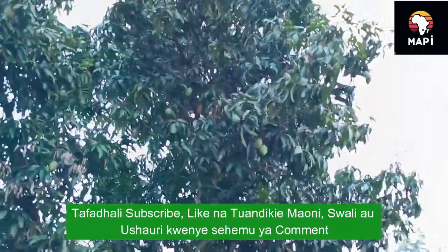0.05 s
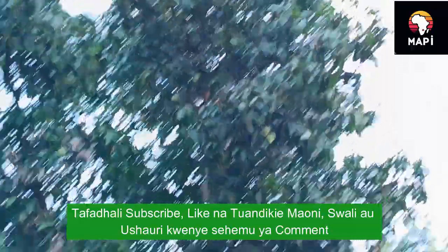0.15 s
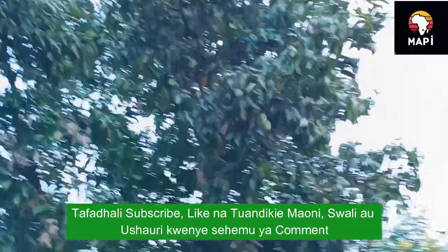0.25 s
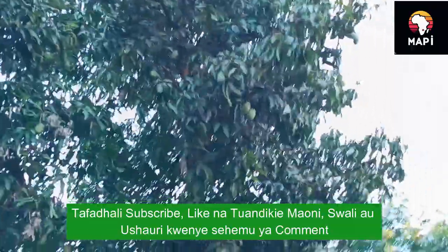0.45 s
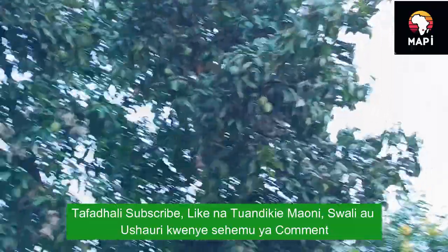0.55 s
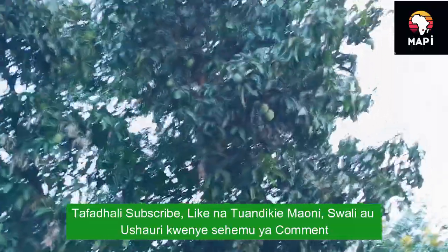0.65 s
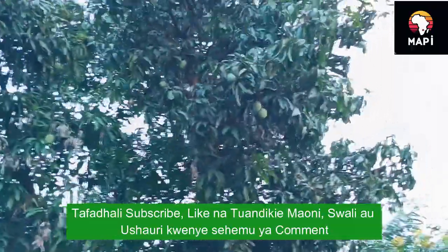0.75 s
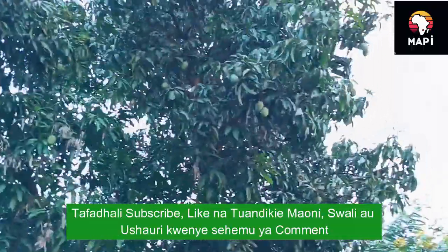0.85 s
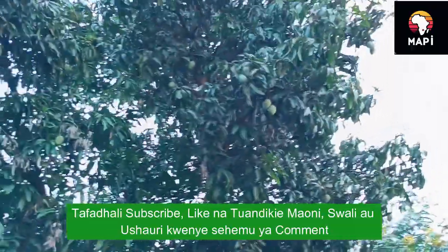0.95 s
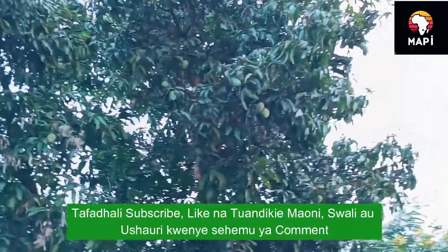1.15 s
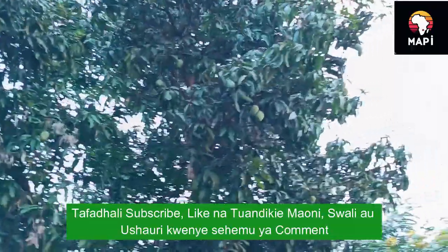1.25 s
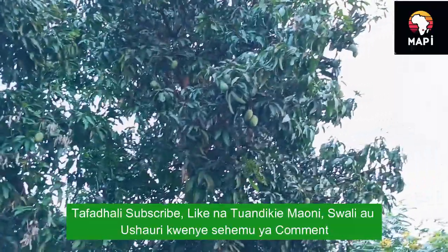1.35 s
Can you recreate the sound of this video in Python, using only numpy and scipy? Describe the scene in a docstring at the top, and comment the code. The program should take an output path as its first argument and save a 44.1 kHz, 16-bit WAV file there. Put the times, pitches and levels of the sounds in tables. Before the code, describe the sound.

Leaves rustle crisply as a tree branch is shaken outdoors. The rustle swells from about 0.1 seconds and is loudest around 0.4, where a light wooden knock and a sharp twig click sound within it. It surges again near 0.7 and 0.9 seconds, then fades. A few single leaf slaps stand out between 1.1 and 1.2 seconds, and by 1.4 only faint outdoor air is left.

```python
"""A leafy branch is shaken outdoors: its rustle swells quickly, surges three times and dies away.
Stiff leaves collide and slide, radiating ticks, friction noise and short damped tones; whole blades flap.
Twigs click, and the branch knocks once in its wooden modes. As the foliage settles, single leaf slaps
stand out. The surrounding trees scatter the sound, over faint outdoor air and a brief low tone."""
import sys
import numpy as np
from scipy import signal
from scipy.fft import rfft, irfft, next_fast_len
from scipy.io import wavfile
from scipy.ndimage import uniform_filter1d, map_coordinates

SR = 44100
rng = np.random.default_rng(int(sys.argv[2]) if len(sys.argv) > 2 else 0)


def store_wav(level_fs):
    """Save 16-bit WAV to argv[1]."""
    pcm = np.round(np.clip(np.atleast_2d(level_fs), -1, 1) * 32767)
    wavfile.write(sys.argv[1], SR, pcm.T.astype(np.int16))


N = 61739

# spectrum of the finest crackle: f/Hz, relative level/dB
FIZZ_SPECTRUM = [(5000, -43), (8500, -0.5), (10000, 3), (12500, -3.5), (14000, -7.5), (15000, -10.5),
                 (15700, -16)]


def foliage():
    """Incoherent superposition: leaf edges tick and fizz, leaf faces rub and whole blades flap."""
    # rustle envelope: t/s, treble tick level/dB, mid-range rub level/dB, low flap level/dB
    envelope = [(0, -67, -75, -59.5), (.09, -59.5, -69, -99), (0.143, -45, -58, -65),
                (0.151, -36, -53.5, -63), (0.184, -39, -46.5, -68.5), (0.213, -31, -37.5, -56),
                (.32, -30.5, -40, -53), (0.371, -22.5, -34.5, -42.5), (0.384, -24, -31.5, -48),
                (0.422, -22.5, -30.5, -41), (.47, -24, -30, -41.5), (.55, -27, -34, -40),
                (0.599, -31.5, -40, -48), (.63, -33, -37, -53.5), (.67, -27.5, -32.5, -44.5),
                (0.701, -31, -37, -45.5), (0.724, -21.5, -31, -43), (0.754, -26.5, -31, -38),
                (0.813, -34, -39, -51.5), (0.869, -28.5, -33, -45), (0.922, -25, -31, -52),
                (.95, -33.5, -38.5, -50), (0.989, -35.5, -38.5, -48.5), (1.067, -46.5, -51.5, -63),
                (1.096, -36.5, -43.5, -63), (1.14, -49, -57, -67), (1.167, -45.5, -47.5, -58),
                (1.245, -66, -65.5, -74), (1.28, -68, -70, -78), (1.33, -65, -69.5, -76),
                (1.4, -64.5, -70.5, -84)]
    # spectra of ticking, rubbing and flapping: f/Hz, relative level/dB
    tick_spectrum = [(2500, -42), (4500, -29), (5600, -11.5), (6500, -6), (7350, 0.5), (8200, -4.5),
                     (9200, -11.5), (11000, -21.5), (13000, -27.5), (15500, -36.5)]
    rub_spectrum = [(900, -30.5), (1700, -9), (2200, -8.5), (2650, -5), (3400, -6.5), (4500, 1),
                    (5400, 3.5), (6500, -6), (9000, -25)]
    flap_spectrum = [(50, -29), (150, -17.5), (250, -9), (400, -17), (650, 0.5), (900, 1.5), (1200, 4),
                     (1600, -6), (2500, -8.5), (5000, -61.5)]
    times, *levels = np.transpose(envelope)
    tick_db, rub_db, flap_db = [np.interp(np.arange(N) / SR, times, db) for db in levels]
    fizz_db = tick_db.max() - 13.5 + 1.24 * (tick_db - tick_db.max())  # grows faster than the ticking
    fizz = crackle(fizz_db, per_s=1600, spread_db=11, slide=1, clump_db=4, clump_rate=200)
    tick = crackle(tick_db - .5, per_s=4500, spread_db=1, slide=1, clump_db=2, clump_rate=350)
    rub = crackle(rub_db - 2, per_s=3000, spread_db=4.5, slide=.9, clump_db=1.97, clump_rate=200)
    flap = crackle(flap_db - 3.5, per_s=900, spread_db=4, slide=1, clump_db=2, clump_rate=120)
    edges = leaf_rings(tick_db - 9, low_hz=6200, high_hz=8796, per_s=431, t60_cycles=85)
    faces = leaf_rings(rub_db - 7.5, low_hz=2390, high_hz=6207, per_s=425, t60_cycles=54)
    blades = leaf_rings(flap_db - 7, low_hz=252, high_hz=1706, per_s=378, t60_cycles=24)
    treble = colour(fizz, FIZZ_SPECTRUM) + colour(tick, tick_spectrum)
    body = colour(rub, rub_spectrum) + colour(flap, flap_spectrum)
    return treble + body + edges + faces + blades


def crackle(level_db, per_s, spread_db, slide, clump_db, clump_rate):
    """Shot noise of tiny contacts over sliding noise; harder shaking raises their rate, up to per_s."""
    chance = np.clip(per_s / SR * amp(.5 * (level_db - level_db.max())), 0, 1)
    sizes = amp(spread_db * np.clip(rng.standard_normal(N), -2, 2)) * np.sign(rng.standard_normal(N))
    ticks = unit((rng.random(N) < chance) * sizes / np.sqrt(chance))
    texture = (ticks + slide * rng.standard_normal(N)) * amp(clump_db * wobble(clump_rate))
    running_power = np.abs(uniform_filter1d(texture ** 2, SR // 30))
    return amp(level_db) * texture / np.sqrt(running_power + 1e-9)


def leaf_rings(level_db, low_hz, high_hz, per_s, t60_cycles):
    """Damped free vibration: each struck leaf rings at a pitch set by its size, middling ones loudest."""
    out, t = np.zeros(N + SR // 10), np.arange(SR // 10) / SR
    rise_cycles, spread_db = .27, 4
    for i, (when, smallness, force) in enumerate(rng.random((int(per_s * N / SR), 3))):
        hz = low_hz * (high_hz / low_hz) ** smallness
        shape = (1 - np.exp(-t * hz / rise_cycles)) ** 2 * amp(-60 * t * hz / t60_cycles)
        strike = (-1) ** i * amp(-spread_db * np.log(1 - .9 * force))
        size_weight = np.sqrt(hz * np.sin(np.pi * smallness))
        out[int(when * N):][:len(t)] += strike * size_weight * shape * np.sin(2 * np.pi * hz * t)
    return amp(level_db) * unit(out[:N])


def leaf_scrapes():
    """Forced resonance: rough friction drives a leaf at its own pitch as it slides over another."""
    # slides: middle t/s, duration/s, resonance f/Hz, bandwidth/Hz, level/dB
    slides = [(0.047, .06, 7460, 450, -63.5), (0.127, 0.063, 7660, 500, -49),
              (0.162, 0.048, 7800, 885, -36.5), (.16, 0.036, 2820, 400, -54),
              (0.252, 0.052, 2370, 600, -45.5), (0.454, .02, 1265, 354, -36.5),
              (0.682, 0.069, 2420, 294, -44), (0.775, 0.054, 1070, 250, -48),
              (0.878, 0.075, 850, 328, -45.5), (0.9, 0.063, 4560, 600, -31.5),
              (0.98, 0.023, 4460, 400, -40), (0.982, 0.025, 850, 350, -50), (1.151, 0.0062, 2920, 350, -43),
              (1.161, 0.021, 4900, 705, -39), (1.221, 0.036, 4750, 600, -50.5),
              (1.313, 0.024, 4830, 700, -58), (1.319, 0.043, 2420, 640, -59),
              (1.394, 0.0061, 2900, 500, -60.5)]
    out, t = np.zeros(N), np.arange(N) / SR
    for middle, duration, hz, width, db in slides:
        friction = rng.standard_normal(N) * amp(2 * wobble(300))
        band = signal.butter(2, [hz - width / 2, hz + width / 2], "bandpass", fs=SR, output="sos")
        swell = np.exp(-(2 * (t - middle) / duration) ** 2)
        out += amp(db) * swell * unit(signal.sosfilt(band, friction))
    return out


def snaps():
    """Impact transients: a twig or leaf contact gives a short crack, then the leaf shivers briefly."""
    # contacts: t/s, bright level/dB, low and fizz level/dB (both relative to bright), t60/s
    contacts = [(0.021, -50.5, -8, -9.5, 0.026), (.1462, -32.5, -22, -8.5, 0.025),
                (.191, -24.5, -27, -16, .009), (0.214, -25, -26, -24, 0.02),
                (0.3657, -19.5, -7, -8.5, 0.037), (0.3961, -8.5, -4.5, -11, 0.013),
                (0.4, -6, -27, -13, 0.013), (0.423, -16, -14, -9, 0.0093), (0.4552, -19, -5, -14, 0.0096),
                (0.55, -21.5, 2, -28, 0.0077), (0.5609, -19.5, 2, -6.5, 0.014),
                (0.7193, -19, -10, -18, .014), (0.745, -17, -6, -20, 0.011), (.784, -19, -4, -26, .015),
                (0.852, -24.5, -13, -3, 0.062), (0.887, -26, -6, -23, 0.009), (0.908, -26, -1, -35, .009),
                (0.919, -21, -1, -21, 0.012), (0.958, -26.5, -1, -14, 0.023), (0.9877, -33, 5, -24, .01),
                (1.0748, -19.5, -5.5, -31, 0.0083), (1.0838, -30, -10, -25, .012),
                (1.13, -29.5, -6.5, -23, 0.01), (1.1577, -22.5, -7.5, -28.5, 0.0084),
                (1.17, -30, -6, -32, .006), (1.1998, -28.5, -4, -20, 0.0088),
                (1.2018, -29, -1.5, -20, 0.011), (1.26, -54, -11.5, -28.5, 0.017),
                (1.3028, -48, 4, -35, 0.008), (1.3166, -48, 1, -36, 0.012)]
    # spectra of a crack's bright and low parts: f/Hz, relative level/dB
    bright_spectrum = [(2000, -39.5), (4200, -17), (5800, -6), (7100, 4.5), (8500, -3.5), (10500, -19.5),
                       (13000, -32.5), (15500, -45)]
    low_spectrum = [(150, -27), (600, -14.5), (1400, -8), (2000, -4.5), (2900, -4.5), (4600, 4), (6500, 7),
                    (9000, -14.5), (15000, -45)]
    attack_s, shiver_db, shiver_t60_s = .00037, -15.5, .083
    bright, low, fizz = np.zeros((3, N))
    for start, db, low_db, fizz_db, t60 in contacts:
        t = np.maximum(np.arange(N) / SR - start, 0)
        decay = amp(-60 * t / t60) + amp(shiver_db - 60 * t / shiver_t60_s)
        shape = (1 - np.exp(-t / attack_s)) * decay
        bright += amp(db) * shape * rng.standard_normal(N)
        low += amp(db + low_db) * shape * rng.standard_normal(N)
        fizz += amp(db + fizz_db) * shape * rng.standard_normal(N)
    return colour(bright, bright_spectrum) + colour(low, low_spectrum) + colour(fizz, FIZZ_SPECTRUM)


def branch_knock():
    """Modal vibration: the wood gives one dull knock just before the loudest crack."""
    # modes of the branch: f/Hz, relative level/dB, t60/s
    wood_modes = [(360, -17, 0.036), (500, -4, 0.042), (670, -6, 0.039), (830, 2, 0.036), (960, 5, 0.03),
                  (1450, -4.5, 0.028)]
    return amp(-27.5) * modes(wood_modes, start_s=.3903)


def tree_scatter(x, level_db=-13.5, t60_s=.14):
    """Diffuse scattering: the surrounding trees return a short, exponentially decaying echo."""
    t = np.arange(SR // 3) / SR
    tail = rng.standard_normal(len(t)) * amp(-60 * t / t60_s)
    return amp(level_db) * signal.fftconvolve(x, tail / np.linalg.norm(tail))[:N]


def outdoor_air():
    """Ambient noise: a steady broadband floor, with a faint low tone that fades at the outset."""
    # spectrum of the air: f/Hz, relative level/dB
    air_spectrum = [(20, -8), (60, -8.5), (150, -5), (350, -10.5), (620, -2.5), (900, -10.5), (2000, -13),
                    (7000, -16.5), (15000, -24)]
    # partials of the low tone: f/Hz, level/dB, t60/s
    partials = [(243, -58, 0.12), (586, -51, 0.11), (1190, -66, 0.088)]
    return amp(-67.5) * unit(colour(rng.standard_normal(N), air_spectrum)) + modes(partials, start_s=0)


def modes(table, start_s):
    """Modal superposition: damped sinusoids with a soft onset, from rows of f/Hz, level/dB, t60/s."""
    t = np.maximum(np.arange(N) / SR - start_s, 0)
    ring = sum((-1) ** k * amp(db - 60 * t / t60) * np.sin(2 * np.pi * hz * t)
               for k, (hz, db, t60) in enumerate(table))
    return ring * (1 - np.exp(-t / .00044))


def colour(x, spectrum):
    """Minimum-phase filtering at unit energy, through points of f/Hz, level/dB."""
    m = 2 * next_fast_len(N)
    hz, db = np.transpose(spectrum)
    gain = amp(np.interp(np.log(np.fft.rfftfreq(m, 1 / SR) + 1), np.log(hz), db))
    cepstrum = irfft(np.log(unit(gain)), m)
    cepstrum[1:m // 2] *= 2  # folding the cepstrum makes the filter causal
    cepstrum[m // 2 + 1:] = 0
    return irfft(rfft(x, m) * np.exp(rfft(cepstrum)), m)[:N]


def wobble(rate):
    """Random modulation: a smooth curve with rate knots a second."""
    return map_coordinates(rng.standard_normal(int(N * rate / SR) + 4), [np.arange(N) * rate / SR])


def amp(db):
    """Amplitude ratio of a level in decibels."""
    return 10 ** (np.asarray(db) / 20)


def unit(x):
    """Normalisation to rms 1."""
    return x / np.sqrt(np.mean(x ** 2) + 1e-20)


def scene():
    """Superposition of the shaken branch's direct sound, its scattered sound and the quiet air."""
    direct = foliage() + leaf_scrapes() + snaps() + branch_knock()
    return (direct + tree_scatter(direct) + outdoor_air())[None]


def record(dry):
    """Band limiting: an ideal low-pass filter removes the highest treble."""
    m, cutoff_hz = 2 * next_fast_len(N), 15750
    return irfft(rfft(dry, m) * (np.fft.rfftfreq(m, 1 / SR) < cutoff_hz), m)[..., :N]


dry = scene()
out = record(dry)
store_wav(out)
```